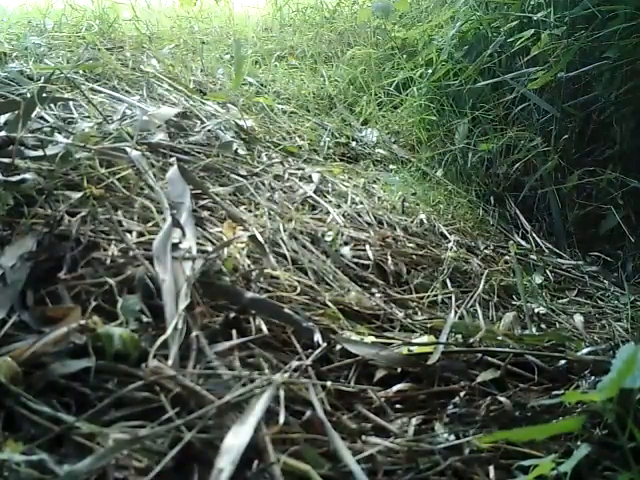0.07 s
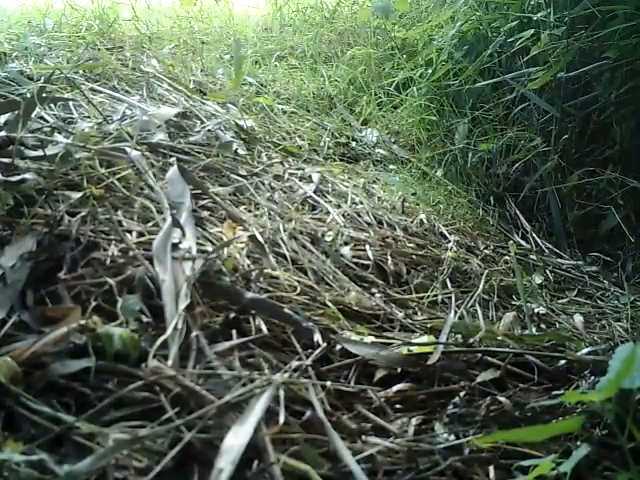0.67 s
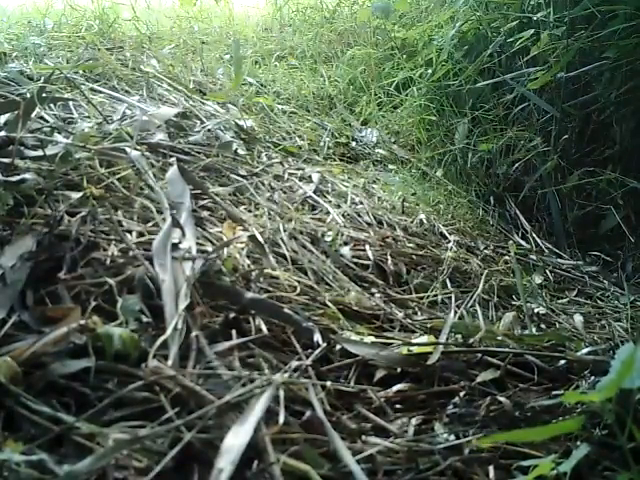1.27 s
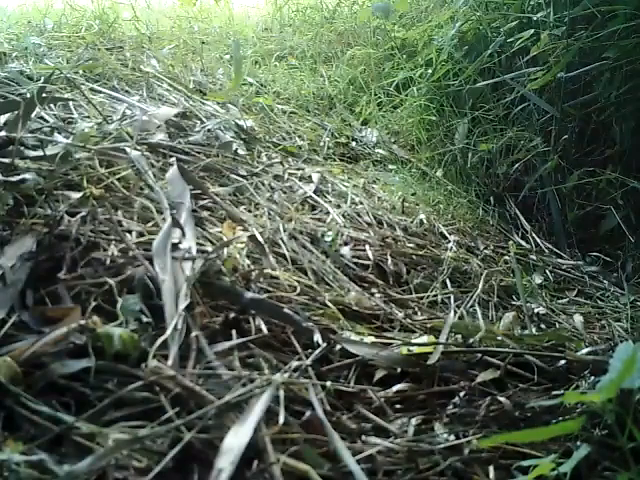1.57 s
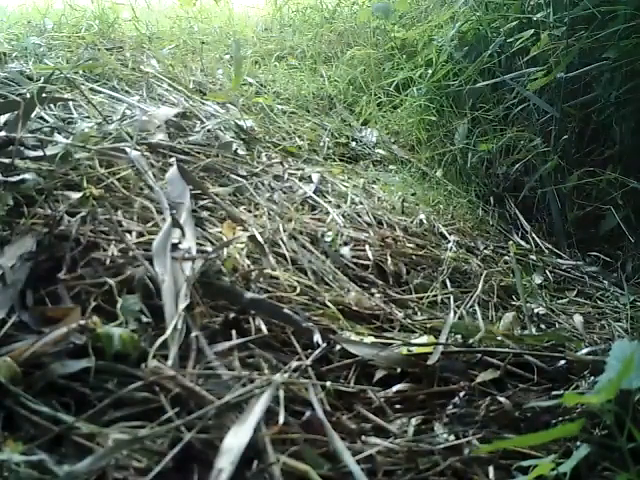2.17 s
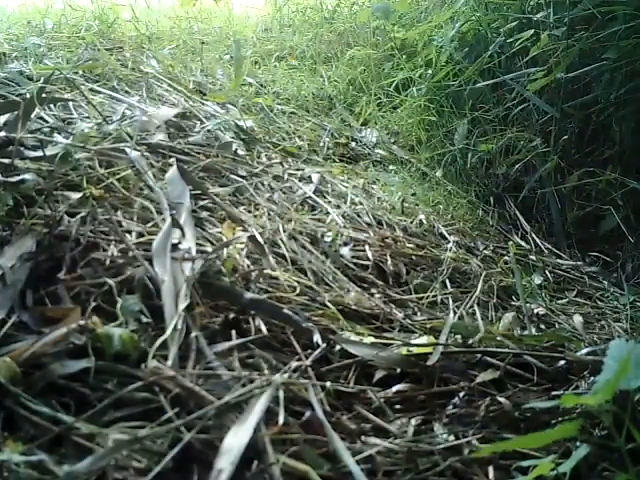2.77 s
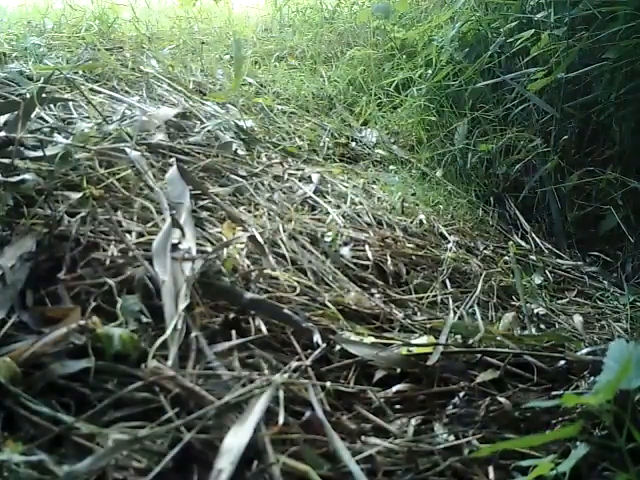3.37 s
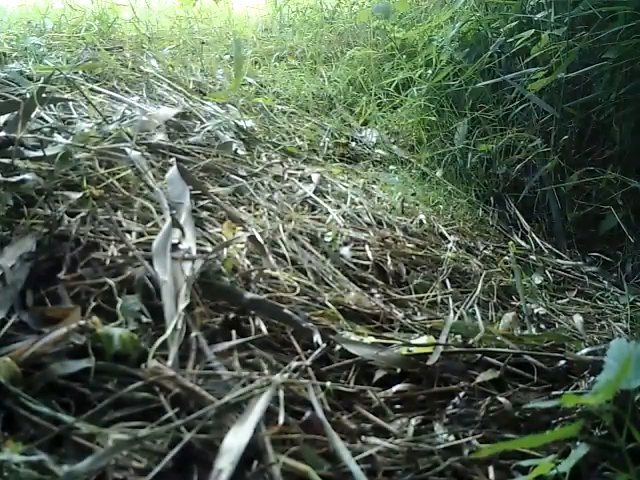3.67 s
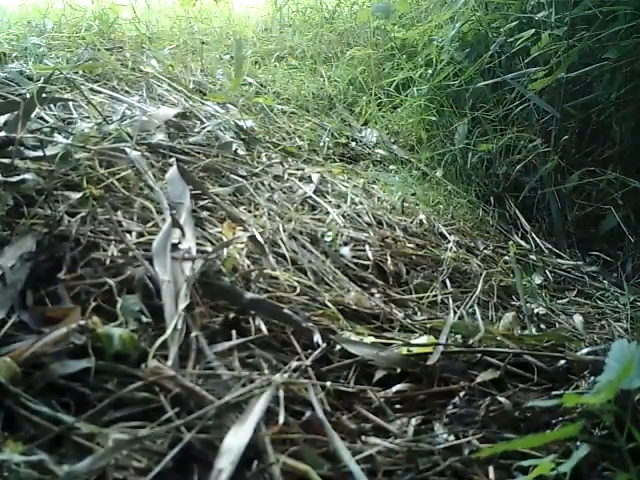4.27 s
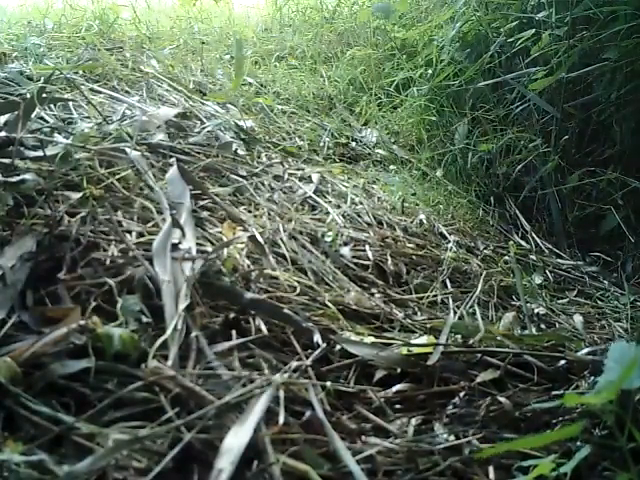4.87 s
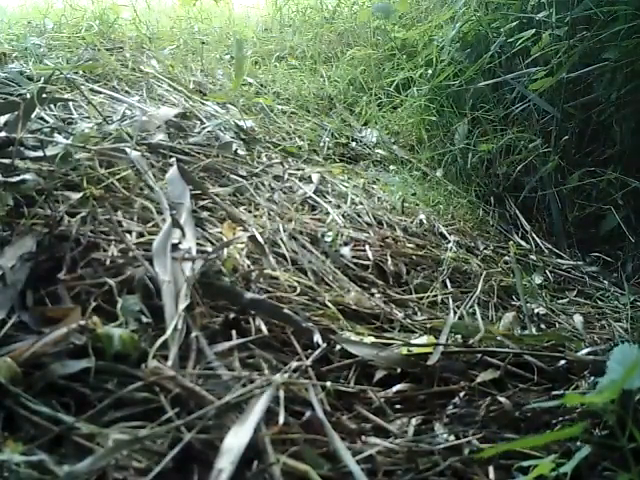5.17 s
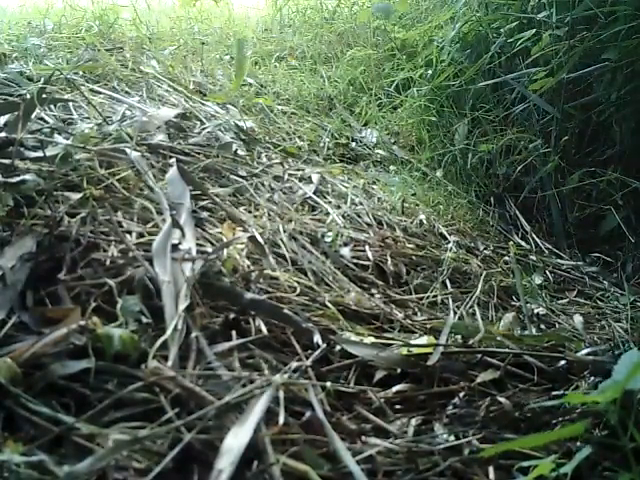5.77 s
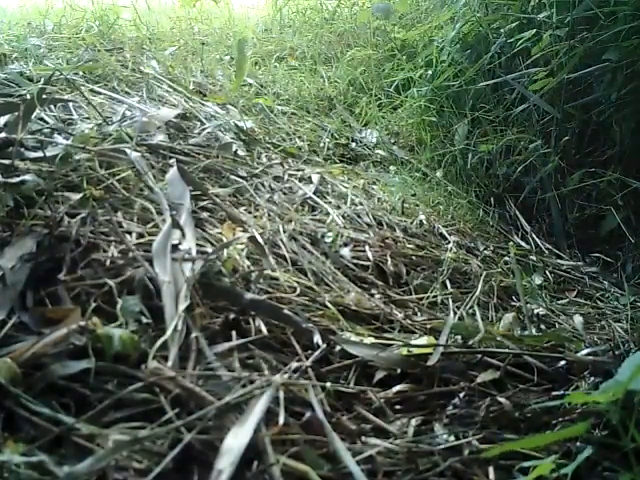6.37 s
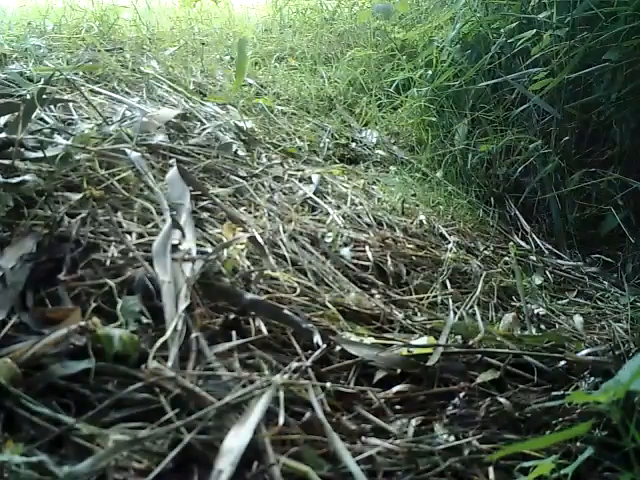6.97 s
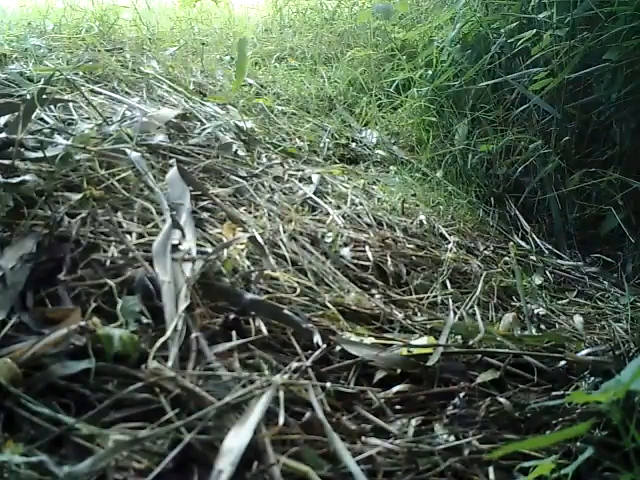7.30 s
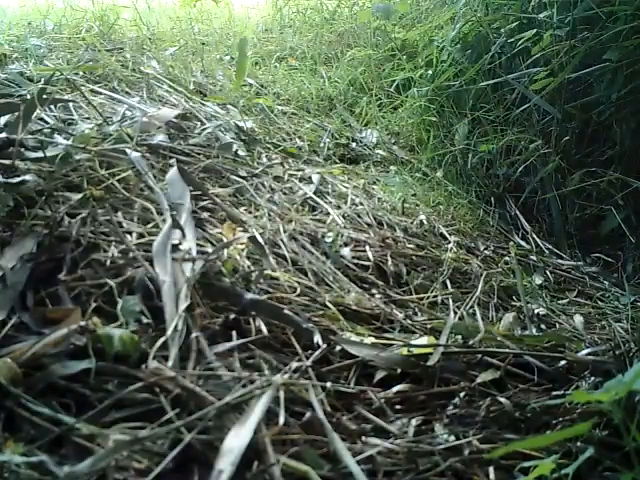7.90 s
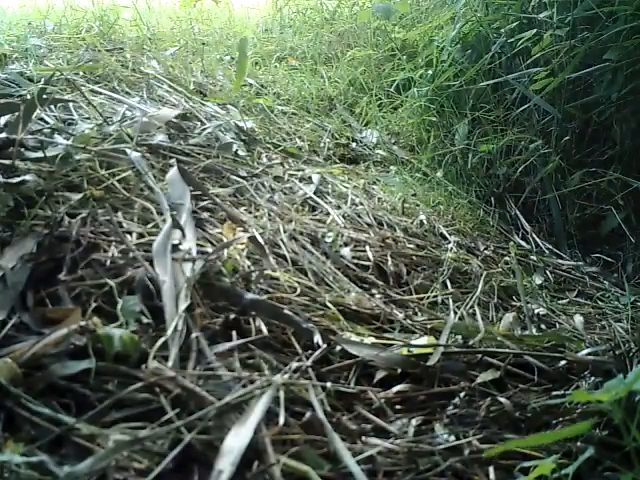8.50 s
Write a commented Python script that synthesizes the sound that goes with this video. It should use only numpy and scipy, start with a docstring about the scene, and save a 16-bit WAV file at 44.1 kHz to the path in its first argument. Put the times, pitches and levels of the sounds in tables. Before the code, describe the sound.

Soft, low wind buffets fade on the microphone, leaving a quiet, hissy rustle of reeds and a far, even rumble.

```python
"""At the edge of a meadow, a small camera rests low among cut reeds.
A breeze buffets its microphone with turbulent pressure and dies away, while the standing reeds rustle
softly by friction over a far, even rumble, out of which a low drone swells once.
The air in the microphone port resonates near 3.3 kHz and colours the sound;
the camera adds preamplifier hiss and a faint buzz of its own."""
import sys
import numpy as np
from scipy import signal
from scipy.fft import rfft, irfft
from scipy.io import wavfile
from scipy.ndimage import uniform_filter1d

SR = 44100
rng = np.random.default_rng(int(sys.argv[2]) if len(sys.argv) > 2 else 0)


def generate_wav(sig):
    """Save sig (samples, or channels by samples) to the path in sys.argv[1] as 16-bit PCM at SR."""
    pcm = np.round(np.clip(np.atleast_2d(sig).T, -1, 1) * 32767).astype(np.int16)
    wavfile.write(sys.argv[1], SR, pcm)


N = 381024
TIME = np.arange(N) / SR

# envelope of the breeze on the microphone, falling in two steps: (time [s], relative level [dB])
BREEZE_ENVELOPE = [(0, -46), (1.75, -44.5), (2.15, -50.5), (3.75, -47), (4.15, -53), (5, -56), (5.7, -60.5),
                   (8.64, -64)]
# spectrum of the wind pressure on the port: (frequency [Hz], relative density [dB])
WIND_SPECTRUM = [(5, -4), (25, 1), (42, -2), (65, -7.5), (95, -16), (140, -26), (220, -35), (500, -61)]
# the strongest eddies, which strike the port one by one: (time [s], relative peak level [dB])
EDDIES = [(0.115, -37.5), (0.386, -31), (0.431, -33.5), (1.326, -33.5), (2.017, -38), (2.188, -36.5),
          (2.424, -35.5), (2.714, -34.5), (2.824, -41), (3.299, -37), (4.994, -38), (5.271, -42)]
# envelope of the rustle, swelling as the breeze leaves: (time [s], level [dB], treble lift [dB])
RUSTLE_ENVELOPE = [(0, -71, 1), (1.6, -68.5, 0), (2.9, -66, 0.5), (5, -65, 1), (6.1, -66, -0.5),
                   (8.64, -65.5, -2.2)]
# spectrum of the brushing leaves: (frequency [Hz], relative density [dB])
RUSTLE_SPECTRUM = [(300, -5.5), (1200, -0.5), (2200, -.5), (3300, 0), (4600, 0.5), (8000, 3.5),
                   (14000, 0.5)]
# spectrum of the far countryside: (frequency [Hz], relative density [dB])
RUMBLE_SPECTRUM = [(20, -4), (70, -0.5), (130, -3), (220, -6), (350, -9), (550, -13.5), (850, -18.5),
                   (1300, -25.5), (2000, -35), (4000, -51)]
# harmonics of the camera buzz: (multiple of the picture rate [1], relative level [dB])
BUZZ_HARMONICS = [(1, -59), (2, -66.5), (3, -79.5), (4, -69.5), (5, -82.5), (6, -76.5), (7, -77.5),
                  (9, -80), (10, -88), (11, -90.5), (12, -82.5), (14, -85.5), (15, -85.5), (18, -87.5),
                  (19, -88), (20, -95.5), (22, -94), (27, -104)]
# spectrum of the preamplifier hiss: (frequency [Hz], relative density [dB])
HISS_SPECTRUM = [(100, 7), (3000, 0.5), (7000, 1), (10000, 2.5), (12000, 1.5), (12900, -7), (14000, -10.5)]


def wind(gain_db=-0.5, flutter_db=1.77, flutter_hz=8, split_hz=70, brightening=0.11, eddy_s=0.09):
    """Turbulent cascade: stronger gusts on the port carry smaller eddies and so reach higher in pitch."""
    breeze_db, = in_time(BREEZE_ENVELOPE)
    flow = evened(noise(WIND_SPECTRUM), eddy_s)   # the gusts alone set its strength
    gust_db = breeze_db + flutter_db * drift(flutter_hz)
    large_eddies = signal.sosfiltfilt(signal.butter(2, split_hz, fs=SR, output="sos"), flow)
    small_eddies = (flow - large_eddies) * from_db(brightening * (gust_db - np.mean(gust_db)))
    return from_db(gust_db + gain_db) * (large_eddies + small_eddies)


def buffets(gain_db=-5.5, half_width_s=0.013, low_hz=26, usual_top_hz=62, db_per_octave=13):
    """Pressure pulses: each close eddy is a short, dull puff whose bandwidth grows with its strength."""
    usual_db = np.mean([db for _, db in EDDIES])
    puffs = np.zeros(N)
    for time_s, db in EDDIES:
        top_hz = usual_top_hz * 2 ** ((db - usual_db) / db_per_octave)
        band = signal.butter(3, [low_hz, top_hz], "band", fs=SR, output="sos")
        pressure = evened(signal.sosfilt(band, rng.standard_normal(N)), 2 * half_width_s)
        envelope = np.exp(-((TIME - time_s) / half_width_s) ** 2)
        puffs += from_db(db + gain_db) * envelope * pressure
    return puffs


def reed_rustle(split_hz=4000):
    """Incoherent summation: countless leaf contacts merge into a rustle that swells, then grows duller."""
    rustle_db, lift_db = in_time(RUSTLE_ENVELOPE)
    leaves = noise(RUSTLE_SPECTRUM)
    body = signal.sosfiltfilt(signal.butter(4, split_hz, fs=SR, output="sos"), leaves)
    treble = leaves - body
    return from_db(rustle_db) * (body + from_db(lift_db) * treble)


def far_rumble(level_db=-61.5):
    """Attenuation with distance: far sound arrives steady, its treble lost on the way."""
    return from_db(level_db) * noise(RUMBLE_SPECTRUM)


def far_drone(peak_s=5.63, half_width_s=0.25, pitch_hz=124, waver_hz=9.5, level_db=-63.5):
    """Narrow-band noise: a hum, wavering in amplitude and phase, rises and sinks once."""
    phase = 2 * np.pi * pitch_hz * TIME
    hum = drift(waver_hz) * np.sin(phase) + drift(waver_hz) * np.cos(phase)
    swell = np.exp(-((TIME - peak_s) / half_width_s) ** 2)
    return from_db(level_db) * swell * evened(hum, half_width_s)


def camera_buzz(picture_hz=29.91, gain_db=-0.5):
    """Crosstalk: the periodic readout of each picture leaks a harmonic series into the sound."""
    buzz = np.zeros(N)
    for harmonic, db in BUZZ_HARMONICS:
        phase = 2 * np.pi * harmonic * picture_hz * TIME + rng.uniform(0, 2 * np.pi)
        buzz += np.sqrt(2) * from_db(db + gain_db) * np.sin(phase)
    return buzz


def microphone_port(x, plug_hz=3273, plug_width_hz=463, pipe_hz=11260, pipe_width_hz=1070, pipe_db=-7):
    """Helmholtz resonance: the air plug passes the lows, rings, and blocks treble but for a pipe mode."""
    plug_poles = resonator_poles(plug_hz, plug_width_hz)
    pipe_poles = resonator_poles(pipe_hz, pipe_width_hz)
    pipe_zeros = (1 - pipe_poles[2]) / 2 * np.array([1, 0, -1])   # band-pass, unit gain at its peak
    plug_mode = signal.lfilter([plug_poles.sum()], plug_poles, x)   # low-pass, unit gain at 0 Hz
    pipe_mode = signal.lfilter(pipe_zeros, pipe_poles, x)
    return plug_mode + from_db(pipe_db) * pipe_mode


def resonator_poles(hz, width_hz):
    """Damped oscillator: the denominator of a two-pole resonance."""
    radius = np.exp(-np.pi * width_hz / SR)
    return np.array([1, -2 * radius * np.cos(2 * np.pi * hz / SR), radius ** 2])


def noise(spectrum):
    """Spectral shaping: white noise takes on the given colour; rms 1."""
    hz, level_db = np.transpose(spectrum)
    bins_hz = np.maximum(np.arange(N // 2 + 1) * SR / N, 1)
    colour = from_db(np.interp(np.log(bins_hz), np.log(hz), level_db))
    return rms_one(irfft(rfft(rng.standard_normal(N)) * colour, N))


def drift(rate_hz):
    """Band-limited fluctuation: smooth random wandering at about the given rate; rms 1."""
    bins_hz = np.arange(N // 2 + 1) * SR / N
    band = bins_hz * np.exp(-(bins_hz / rate_hz) ** 2)
    return rms_one(irfft(rfft(rng.standard_normal(N)) * band, N))


def evened(x, span_s):
    """Envelope flattening: division by the running rms holds the strength near 1."""
    size = int(span_s * SR)
    power = uniform_filter1d(uniform_filter1d(x ** 2, size), size)
    return x / np.sqrt(power + 1e-12)


def in_time(rows):
    """Linear interpolation: each column of an envelope at every sample."""
    times_s, *columns = np.transpose(rows)
    return [np.interp(TIME, times_s, column) for column in columns]


def rms_one(x):
    """Normalisation to an rms of 1."""
    return x / np.sqrt(np.mean(x ** 2) + 1e-20)


def from_db(db):
    """Decibel law: level to amplitude ratio."""
    return 10 ** (np.asarray(db) / 20)


def scene():
    """Superposition: the pressures at the microphone add in one channel."""
    return (wind() + buffets() + reed_rustle() + far_rumble() + far_drone())[None]


def record(dry, hiss_db=-76, cutoff_hz=13850):
    """Transduction: the port colours the sound, the electronics add hiss and buzz and cut the top."""
    hiss = from_db(hiss_db) * noise(HISS_SPECTRUM)
    voltage = microphone_port(dry) + hiss + camera_buzz()
    low_pass = signal.ellip(12, 0.1, 70, cutoff_hz, fs=SR, output="sos")
    return signal.sosfilt(low_pass, voltage)


dry = scene()
out = record(dry)
generate_wav(out)
```